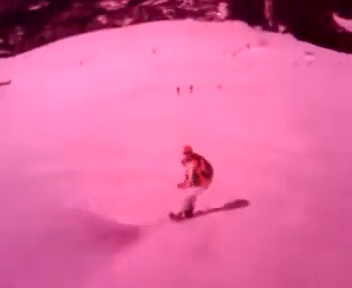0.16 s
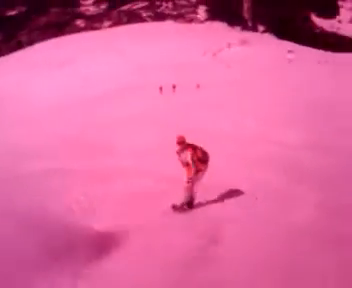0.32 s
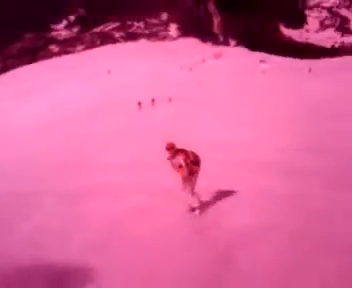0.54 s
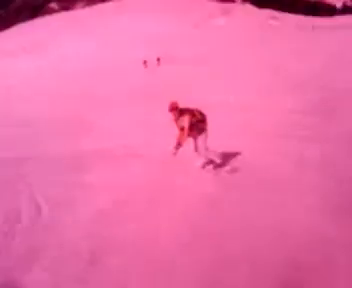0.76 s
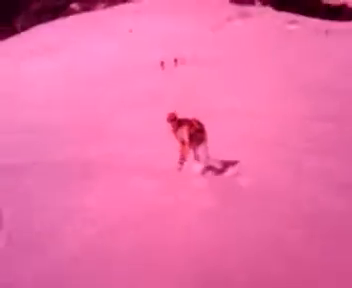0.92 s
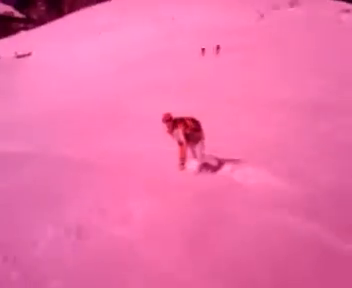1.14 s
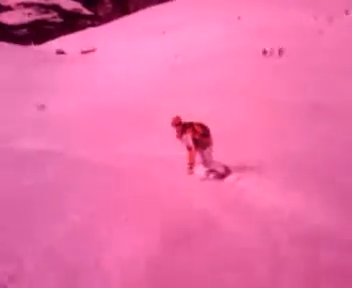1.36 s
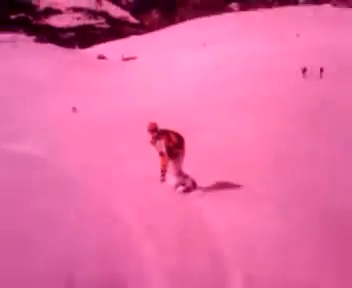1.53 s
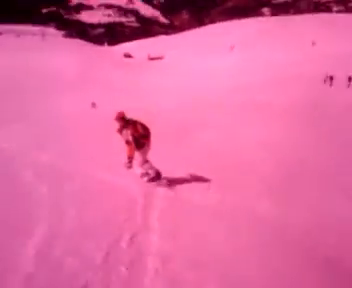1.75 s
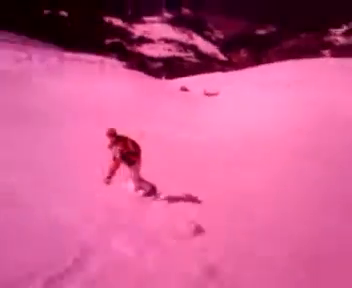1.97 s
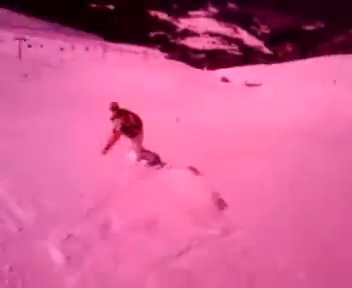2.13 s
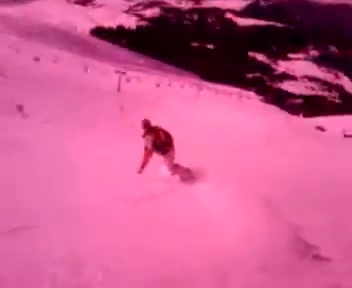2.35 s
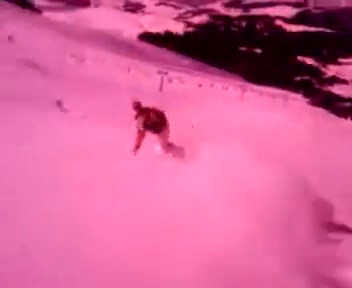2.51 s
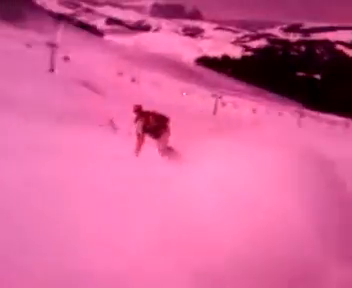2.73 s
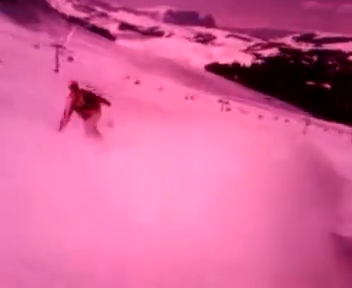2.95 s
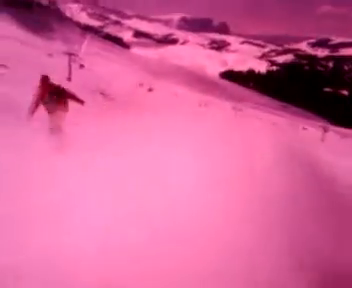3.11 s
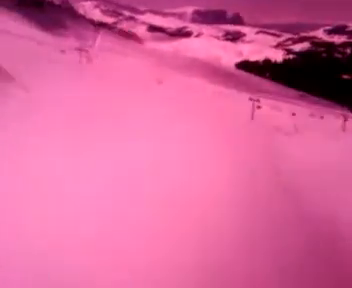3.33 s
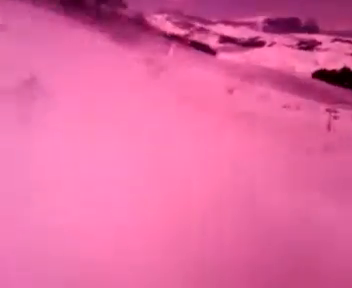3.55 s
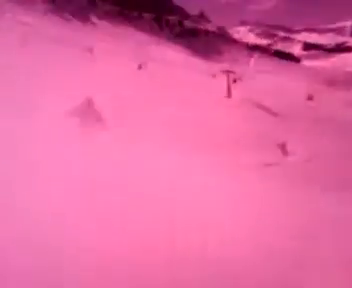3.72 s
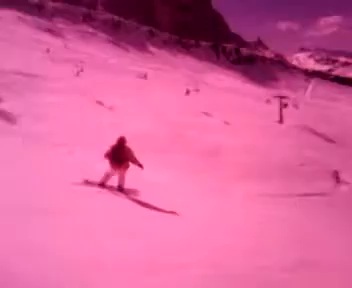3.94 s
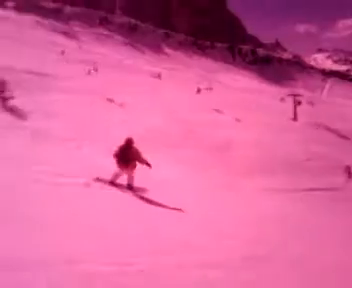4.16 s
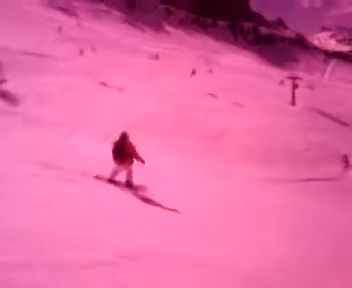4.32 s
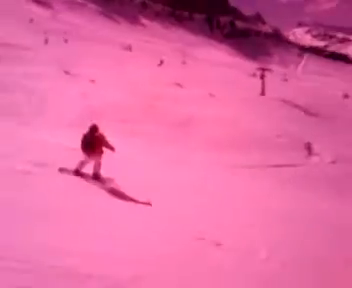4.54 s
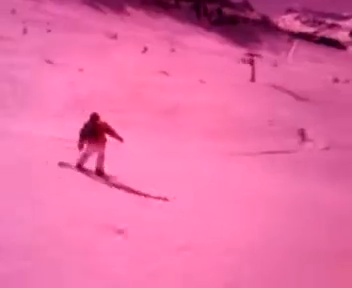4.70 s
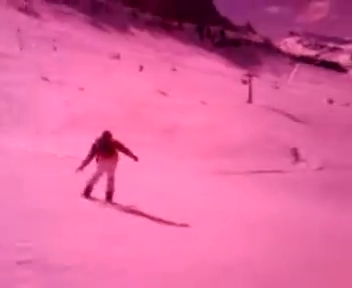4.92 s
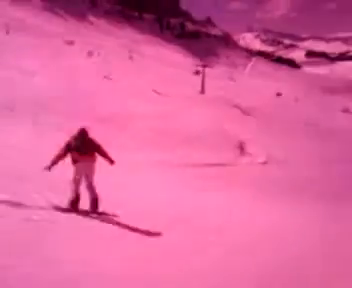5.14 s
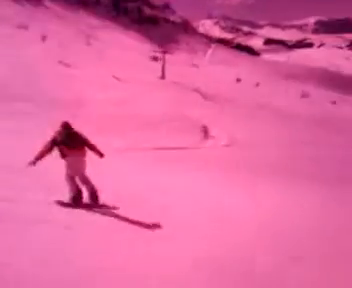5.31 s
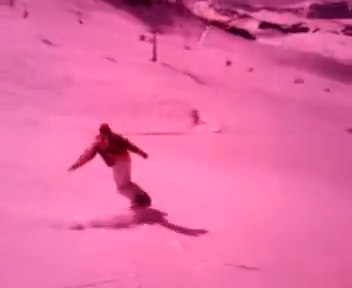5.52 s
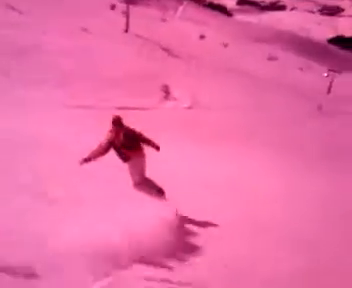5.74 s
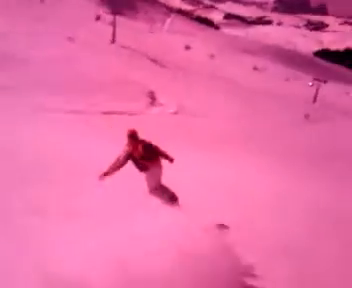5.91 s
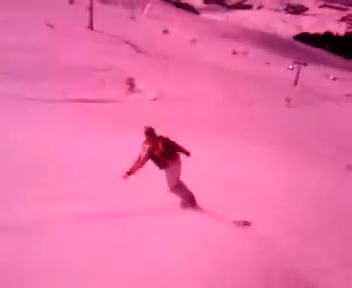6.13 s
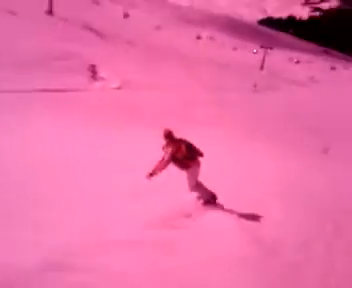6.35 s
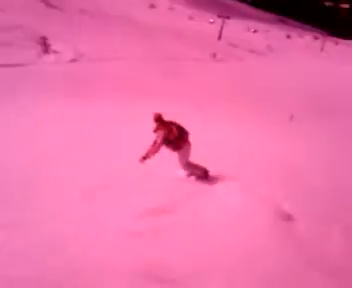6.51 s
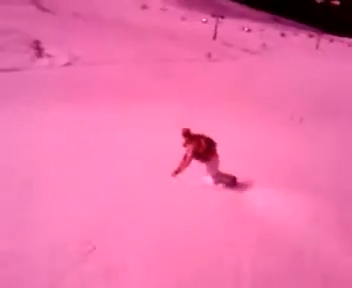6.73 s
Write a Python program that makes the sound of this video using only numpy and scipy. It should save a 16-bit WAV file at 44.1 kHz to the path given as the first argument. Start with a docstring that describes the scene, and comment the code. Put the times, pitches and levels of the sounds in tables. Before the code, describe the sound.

Patchy snow scraping swells into a long, gritty snowboard skid, drops to faint gliding with pellet ticks, then carves again with thin whistling hiss.

```python
"""On a snow slope, a snowboard skids hard, glides and carves more softly, close to a small camera.
The edge breaks snow crystals; their random impulses and noise excite resonances of the board and spray.
Damped modes sound the pellets on the camera shell and the lumps under the deck; narrow-band noise whistles.
Low-frequency noise is the wind; the camera rounds peaks, limits the band and adds faint overload ticks."""
import sys
import numpy as np
from scipy import signal
from scipy.io import wavfile
from scipy.ndimage import uniform_filter1d

SR = 44100
rng = np.random.default_rng(int(sys.argv[2]) if len(sys.argv) > 2 else 0)


def dump_mix(stems):
    """Bounce the given channels to the path in sys.argv[1] as a 16-bit WAV at rate SR."""
    frames = np.atleast_2d(stems).T  # one column per channel
    limited = np.clip(frames, -1, 1)  # hard clip at full scale
    pcm = np.round(limited * 32767).astype(np.int16)
    wavfile.write(sys.argv[1], SR, pcm)


N = 302967


def undb(db):
    """Logarithmic level: amplitude gain is 10 to the power of dB / 20."""
    return 10 ** (np.asarray(db) / 20)


def unit(x):
    """Normalisation: scale the effective (rms) value to 1."""
    return x / np.sqrt(np.mean(x ** 2))


def curves(table):
    """Linear interpolation: the columns of a table against time, at every sample."""
    times, *columns = np.transpose(table)
    return [np.interp(np.arange(N) / SR, times, column) for column in columns]


def walk(rate):
    """Random modulation: levels held for 1 / rate seconds, smoothed twice, with rms 1."""
    hold = max(int(SR / rate), 51)
    steps = rng.standard_normal(N // 50)[np.arange(N) // hold]
    return unit(uniform_filter1d(uniform_filter1d(steps, hold), hold))


def resonate(x, modes, shimmer_db=0.):
    """Modal superposition: steep parallel resonances, each with its own random level shimmer."""
    out = 0
    for k, (hz, width, db) in enumerate(modes):
        # two passes narrow the band, so each pass is 1.55 times as wide
        b, a = signal.iirpeak(hz, hz / (1.55 * width), SR)
        band = unit(signal.lfilter(b, a, signal.lfilter(b, a, x)))
        # alternate signs let neighbouring bands join
        out = out + (-1) ** k * undb(db + shimmer_db * walk(45)) * band
    return unit(out)


def grains(per_s, scatter_db):
    """Shot noise: crystals break at random moments, a few far louder than most."""
    when, size, sign = rng.random((3, N))
    loudness = undb(-scatter_db * np.log(size + 0.005))
    return unit((when < per_s / SR) * loudness * np.sign(sign - .5))


def strike(s, db, hz, t60_ms, rise_ms):
    """Impulse response of a damped mode: a sine rises at s and decays by 60 dB per t60."""
    out, t = np.zeros(N), np.arange(SR // 8) / SR
    start = int(s * SR)
    rise = 1 - np.exp(-1000 * t / rise_ms)
    shape = rise * np.exp(-np.log(1000) * 1000 * t / t60_ms)
    tone = undb(db) * shape / shape.max() * np.sin(2 * np.pi * hz * t)
    out[start:start + len(t)] = tone[:N - start]
    return out


def bump(s, length):
    """Raised-cosine window: 0 to 1 and back, centred at s, its width at half height being length."""
    return np.cos(np.pi * np.clip((np.arange(N) / SR - s) / length / 2, -.5, .5)) ** 2


# the ride, before swells: t/s, base scrape level/dB, deck rumble level/dB, spray hiss level/dB
RIDE = [(0, -34, -44.5, -36.5), (.15, -37, -44.5, -35), (.45, -34, -44, -36), (.75, -32.5, -37.5, -29.5),
        (1.05, -28, -32.5, -29.5), (1.2, -28, -39, -27.5), (1.33, -25.5, -34.5, -28.5),
        (1.39, -20, -24, -32.5), (1.7, -13.5, -19, -22), (2.3, -14.5, -21.5, -21.5), (2.87, -17, -22, -22),
        (3.0, -22, -24.5, -38), (3.15, -22, -21.5, -32.5), (3.3, -24.5, -22, -33),
        (3.42, -26.5, -25.5, -32), (3.75, -33, -28.5, -34), (3.9, -36, -35, -37),
        (4.5, -34.5, -40.5, -34.5), (4.7, -36, -30, -36), (5.2, -33.5, -28, -33.5), (5.3, -29, -27.5, -28),
        (5.4, -26, -25.5, -27.5), (5.75, -26, -28.5, -27), (6.15, -29.5, -27, -31.5),
        (6.3, -30, -39.5, -30), (6.5, -37.5, -39, -36), (6.6, -31.5, -52, -29.5), (6.87, -31, -37, -34.5)]
# ring of the steel edge, strongest in the hard skid, before swells: t/s, level/dB
EDGE_RING_LEVEL = [(0, -38.5), (1.32, -31.5), (1.4, -22), (1.65, -18.5), (2.87, -18), (2.98, -29.5),
                   (3.35, -33), (3.7, -42.5), (5.5, -47), (5.75, -32), (6.87, -42)]
# resonances of board flex, deck, base, edge, spray and fine powder: f/Hz, width/Hz, relative level/dB
FLEX_MODES = [(233, 100, -6.5), (339, 127, 5.5)]
DECK_MODES = [(467, 166, 1.5), (616.5, 119, 3), (742, 300, 0)]
SCRAPE_MODES = [(851, 510, -3), (1230, 670, 1), (1635, 600, -2)]
RING_MODES = [(1994, 840, -2), (2200, 706, 2.5)]
HISS_MODES = [(2415, 610, 0.51), (2798, 740, 0.29), (3369, 426, -1.4)]
POWDER_MODES = [(3790, 500, 0)]
REFERENCE_DB = -20  # board level at which flex and wind have their reference levels
FLEX_REFERENCE_DB, FLEX_SLOPE = -31, 0.52  # dB; dB per dB of rumble
POWDER_DB = -19  # relative to the smoothed hiss
UNEVEN_DB = 1  # rms swell of each part over uneven snow, where the sound is fully patchy


def edge():
    """Stochastic excitation: a shared stream of breaking crystals and separate noises drive the parts."""
    scrape, rumble, hiss = curves(RIDE)
    flex = FLEX_REFERENCE_DB + FLEX_SLOPE * (rumble - REFERENCE_DB)
    # part: level dB, resonances, share of its own noise, shimmer dB
    parts = [(flex, FLEX_MODES, .9, 1.3),
             (rumble, DECK_MODES, 0.81, 1.4),
             (scrape, SCRAPE_MODES, .75, 1.5),
             (curves(EDGE_RING_LEVEL)[0], RING_MODES, 0.41, 1.6),
             (hiss, HISS_MODES, 0.73, 2.2)]
    # a hard skid breaks so many crystals at once that the sound evens out
    patchy = np.clip((-11.0 - scrape) / 10.0, .35, 1)
    grip = walk(35)  # grip and slip, dB, common to all parts
    crystals = grains(2500, 4.2)
    out = 0
    for level, modes, own, shimmer_db in parts:
        # each part also feels its own stretch of snow
        mix = np.clip(own + (1 - patchy) * 0.16, 0, 1)
        drive = mix * rng.standard_normal(N) + np.sqrt(1 - mix ** 2) * crystals
        centre_hz = np.mean(modes, axis=0)[0]
        swell = crusts(centre_hz) + patchy * (grip + UNEVEN_DB * walk(22))
        out = out + undb(level + swell) * resonate(drive, modes, patchy * shimmer_db)
    # the finest powder hangs in the air: it follows the hiss slowly and sputters fast
    powder_level = uniform_filter1d(hiss, SR // 3) + POWDER_DB
    powder = resonate(rng.standard_normal(N), POWDER_MODES, 2.5)
    return out + undb(powder_level + 3.1 * walk(140)) * powder


# crusty patches under the board: centre t/s, width at half height/s, swell level/dB at f, centre f/Hz
CRUSTS = [(0.106, .08, 5.5, 1800), (0.201, 0.027, 10.5, 500), (0.372, .07, 9, 330), (0.566, 0.052, 12, 597),
          (0.677, 0.069, 9, 1980), (0.805, 0.064, 4.5, 3020), (0.86, 0.037, 1, 500),
          (0.994, 0.044, 7.5, 450), (1.053, 0.065, 8, 3000), (1.11, 0.047, 8.5, 450),
          (1.744, 0.048, 2, 330), (2.35, 0.044, 6, 330), (3.276, 0.025, 2.5, 600),
          (3.342, 0.025, 5.5, 1290), (3.624, 0.061, 3.5, 550), (3.81, 0.038, 5.5, 330),
          (4.07, 0.027, 2, 1200), (4.283, 0.023, 5.5, 1310), (4.637, 0.04, 10, 1480),
          (4.885, 0.052, 1.5, 402), (5.007, 0.043, 7.5, 300), (5.11, 0.031, 4.5, 546),
          (5.398, 0.044, 2.5, 1400), (5.683, 0.045, 7, 2020), (5.82, 0.065, 2, 2830),
          (6.022, 0.074, 1.5, 2800), (6.57, 0.052, 8.5, 2500), (6.756, .09, 10.5, 2020),
          (6.803, 0.072, 3.5, 600)]
CRUST_OCTAVES = 0.64  # standard deviation of the swell over pitch


def crusts(hz):
    """Frequency-selective gain: each patch swells a part the more, the nearer hz is to its centre."""
    swell = 0
    for s, length, db, centre_hz in CRUSTS:
        octaves = np.log2(hz / centre_hz)
        swell = swell + db * np.exp(-(octaves / CRUST_OCTAVES) ** 2 / 2) * bump(s, length)
    return swell


# snatches of edge whistle: centre t/s, width at half height/s, f/Hz, level/dB before flutter
WHISTLES = [(5.77, 0.097, 2180, -31), (6.138, 0.063, 2200, -36), (6.325, 0.12, 2140, -27.5),
            (6.44, 0.069, 2170, -31.5), (6.614, 0.12, 2180, -28), (6.753, 0.19, 2255, -33),
            (6.86, .08, 2060, -31)]
WHISTLE_WIDTH_HZ = 180.  # of the noise band before flutter


def whistle():
    """Quadrature modulation: slow noise makes a wavering tone where the steel edge runs clean."""
    slow = signal.butter(2, WHISTLE_WIDTH_HZ / 2, fs=SR, output="sos")
    wobble = signal.sosfilt(slow, rng.standard_normal((2, N)))
    in_phase = undb(3.5 * walk(40)) * unit(wobble[0])
    quadrature = undb(2.7 * walk(40)) * unit(wobble[1])
    envelope = in_phase + 1j * quadrature
    t, out = np.arange(N) / SR, 0
    for s, length, hz, db in WHISTLES:
        tone = np.real(envelope * np.exp(2j * np.pi * hz * t))
        out = out + undb(db) * bump(s, length) * tone
    return out


# ice pellets on the camera shell: t/s, reference level/dB, reference f/Hz, spatter level/dB re reference
PELLETS = [(0.2607, -26, 2030, -19), (0.7835, -17, 2190, -19), (0.819, -16, 3070, -18),
           (3.4676, -20, 3550, -20), (3.492, -12, 2570, -8.5), (3.7308, -11.5, 2600, -14),
           (3.757, -21.5, 2870, -22), (4.031, -11, 2640, -15.5), (4.0637, -17, 2680, -4.5),
           (4.2866, -22, 2980, -16), (4.4123, -10.5, 2690, -9), (4.6474, -24, 2610, -20),
           (4.9236, -19, 2660, -10), (5.2078, -12.5, 2660, -19), (5.8174, -18, 2550, -19),
           (6.5109, -18.5, 2440, -9), (6.5832, -18, 2120, -17)]
# shell modes: f as a share of the pellet's reference f, t60/ms, level/dB re reference
SHELL_MODES = [(0.95, 5.9, 4), (0.55, 7.8, -11)]
# spatter resonances: f/Hz, width/Hz, relative level/dB
SPATTER_MODES = [(1050, 380, 1), (2550, 1000, 4), (3200, 250, -13.5)]
SPATTER_T60_MS = 55


def pellets():
    """Impact excitation: each pellet clicks two shell modes, then shatters into decaying shot noise."""
    t, clicks, fall = np.arange(N) / SR, 0, 0
    for s, db, hz, spatter_db in PELLETS:
        for share, t60_ms, mode_db in SHELL_MODES:
            clicks = clicks + strike(s, db + mode_db, hz * share, t60_ms, 0.19)
        decay_db = 60 * 1000 * np.clip(t - s, 0, 1) / SPATTER_T60_MS
        fall = fall + (t > s) * undb(db + spatter_db - decay_db)
    return clicks + fall * resonate(grains(5600, 1.2), SPATTER_MODES)


# lumps of snow that thud under the deck: t/s, envelope peak level/dB, f/Hz
LUMPS = [(0.167, -27, 385), (0.555, -22, 307), (2.926, -17.5, 680), (3.319, -15, 664), (3.615, -20, 487),
         (3.726, -16, 746), (4.058, -21, 1010), (4.165, -17.5, 370), (4.615, -19, 1490), (5.106, -19, 497),
         (5.348, -11.5, 450), (5.684, -15, 434)]


def lumps():
    """Soft impact: a gradual push (1.3 ms rise) excites one mode, damped with a t60 of 33 ms."""
    return sum(strike(s, db, hz, 33, 1.3) for s, db, hz in LUMPS)


# wind resonances: f/Hz, width/Hz, relative level/dB
WIND_MODES = [(38, 25, -19), (65, 44, -6), (107, 76, -1), (174, 140, 0)]
WIND_REFERENCE_DB, WIND_SLOPE = -39.5, 0.65  # dB; dB per dB of weighted board level


def wind():
    """Turbulence noise: low eddies buffet the microphone port, rising with the board's level."""
    scrape, rumble, _ = curves(RIDE)
    board = 0.73 * scrape + 0.29 * rumble
    level = WIND_REFERENCE_DB + WIND_SLOPE * (board - REFERENCE_DB)
    eddies = resonate(rng.standard_normal(N), WIND_MODES)
    return undb(level) * unit(undb(2.8 * walk(12)) * eddies)


# overload ticks, mostly in the hard skid: t/s, peak level/dB before the converter filter
TICKS = [(1.6704, -53), (1.678, -24), (1.7305, -29), (1.7384, -44), (1.9393, -31.5), (1.9484, -53),
         (1.96, -36), (1.9674, -32), (2, -35), (2.0904, -29.5), (2.1261, -54), (2.2204, -40), (2.3015, -42),
         (2.3082, -38), (2.3835, -42), (2.498, -41), (2.5168, -29.5), (2.8694, -25.5)]
TOP_HZ = 4560  # lower limit of the ticks; the sound band stops 400 Hz above it


def ticks():
    """Transient spectrum: very short corners, high-passed so that only their treble remains."""
    t = np.arange(256) / SR
    treble = signal.butter(4, TOP_HZ, "high", fs=SR, output="sos")
    corner = signal.sosfilt(treble, t * np.exp(-1000 * t / 0.086))  # time constant 0.086 ms
    at = np.zeros(N)
    for s, db in TICKS:
        at[int(s * SR)] = undb(db)
    return np.convolve(at, corner / np.abs(corner).max())[:N]


def scene():
    """Linear superposition: board, whistle, hits and wind add at one microphone."""
    return (edge() + whistle() + pellets() + lumps() + wind())[None]


def record(dry):
    """Saturation and band limiting: peaks round off, the band narrows, and treble ticks are added."""
    rounded = np.tanh(1.5 * dry) / 1.5
    rolled = signal.sosfilt(signal.butter(6, 3500., fs=SR, output="sos"), rounded)
    rolled = signal.sosfilt(signal.butter(2, 36., "high", fs=SR, output="sos"), rolled)
    narrow = signal.sosfilt(signal.cheby2(16, 70, TOP_HZ + 400, fs=SR, output="sos"), rolled)
    converter = signal.ellip(8, .2, 70, 15800, fs=SR, output="sos")  # upper limit, Hz
    return signal.sosfilt(converter, narrow + ticks())


dry = scene()
out = record(dry)
dump_mix(out)
```